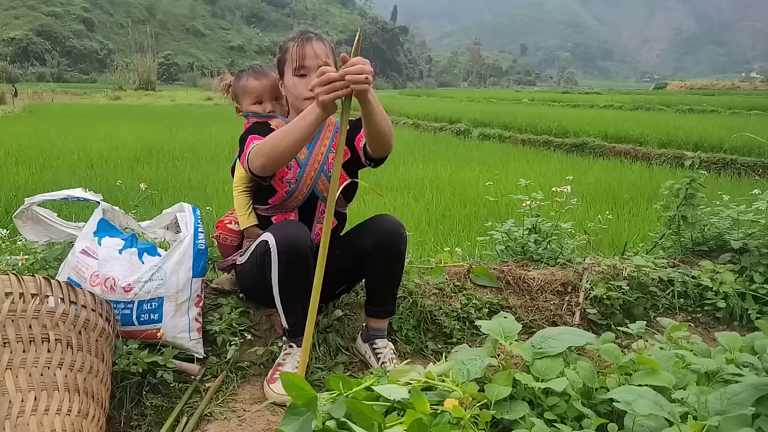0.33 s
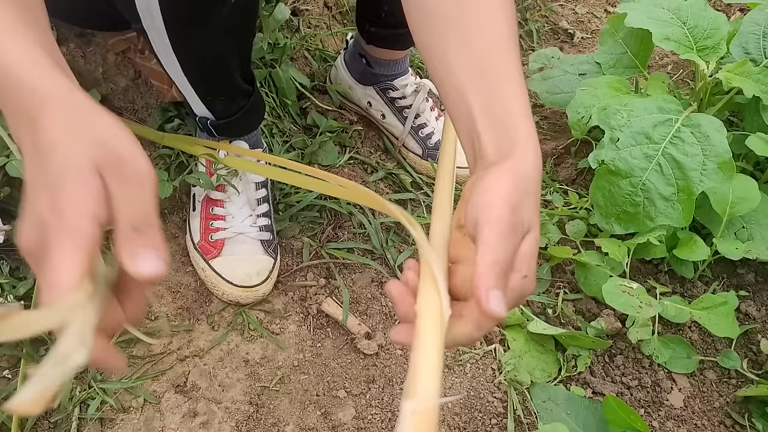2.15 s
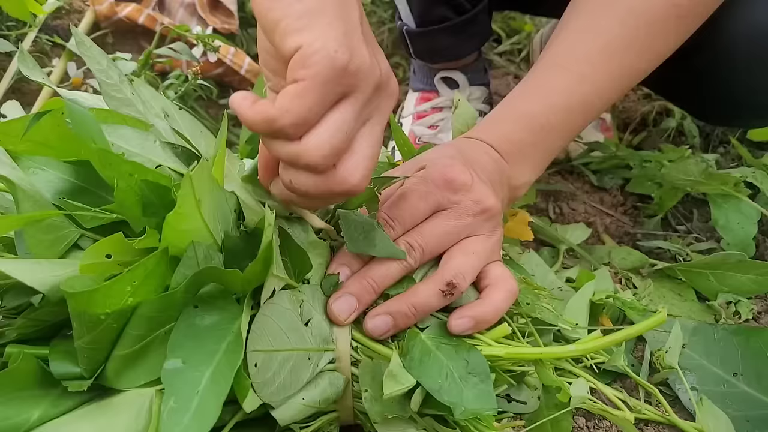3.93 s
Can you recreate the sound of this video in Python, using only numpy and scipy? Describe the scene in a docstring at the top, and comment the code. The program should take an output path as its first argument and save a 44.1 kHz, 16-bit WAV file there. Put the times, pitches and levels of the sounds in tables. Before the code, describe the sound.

Close to the microphone, hands tear the stringy skin off a plant stalk in several short rips with small cracks. They then rummage in a heap of leafy greens and snap stems, hardest around the middle, then more gently to the end. Behind them, in a quiet field, insects hum faintly, with an occasional cricket trill, thin bird chirps and distant calls.

```python
"""Outdoors by a field, insects hum throughout, with now and then a cricket, bird chirps and far calls.
Near the start the sound dips for an instant, then hands tear the stringy skin off a stalk.
From about 1.7 s they rummage in a heap of leafy greens and snap stems, hardest around 3 s, then more
gently to the end. Tearing and rustling are swarms of tiny breaks; thicker fibres and stems give way
with single cracks, close to a left and a right microphone."""
import sys
import numpy as np
from scipy import signal
from scipy.fft import rfft, irfft, next_fast_len
from scipy.io import wavfile
from scipy.ndimage import uniform_filter1d, map_coordinates

SR = 44100
rng = np.random.default_rng(int(sys.argv[2]) if len(sys.argv) > 2 else 0)


def transcribe(signal):
    """Save signal, clipped to [-1, 1], as a 16-bit WAV file at the path in sys.argv[1]."""
    frames = np.atleast_2d(signal).T
    limited = np.clip(frames, -1, 1)
    pcm = np.round(limited * 32767).astype(np.int16)
    wavfile.write(sys.argv[1], SR, pcm)


N = 254016

# pitch ranges of fine fibres (high), crunch (middle) and body (low): lowest f/Hz, highest f/Hz
PITCH_RANGES = [(5000, 20000), (1200, 5000), (200, 1200)]
# tone colour (how strong each frequency is) of stalk skin and of a breaking stem: f/Hz, level/dB
SKIN_COLOUR = [(150, -23), (330, -26.5), (500, -23), (1300, -15), (2700, -4), (4600, -13), (5800, -9.5),
               (7100, 1.5), (8300, -2), (9500, 4), (11500, 0.5), (13200, -7.5), (15000, -10),
               (16500, -29.5)]
STEM_COLOUR = [(150, -8.5), (350, -2), (900, -4), (2000, 4), (4200, 1.5), (6700, 0.5), (9000, -0.5),
               (11500, 4.5), (14500, -6.5), (16000, -19)]
# how the two microphones hear skin, and leaves or stems: f/Hz, left minus right/dB
SKIN_BALANCE = [(700, -1), (1300, -1.5), (2400, 3.5), (4400, 3), (8100, -9.5), (11000, -1), (15000, 12.5)]
GREENS_BALANCE = [(400, -2), (1300, 1.5), (2400, 3), (4400, -8), (8100, -5), (15000, -4)]


def amp(db):
    """Turn decibels into a gain to multiply by."""
    return 10 ** (np.asarray(db) / 20)


def unit(x):
    """Scale a signal to an average power of 1."""
    return x / np.sqrt(np.mean(x ** 2) + 1e-20)


def along(points, hz):
    """Read between (frequency, value) points, giving each octave equal room."""
    freqs, values = np.transpose(points)
    return np.interp(np.log(hz + 1), np.log(freqs + 1), values)


def clock():
    """The time of every sample, in seconds."""
    return np.arange(N) / SR


def wobble(rate):
    """A smooth curve through `rate` random values a second."""
    return map_coordinates(rng.standard_normal(int(N * rate / SR) + 4), [np.arange(N) * rate / SR])


def band(hz, lo, hi, order=6):
    """A gain that lets frequencies from lo to hi through; a higher order has steeper edges."""
    return ((1 + (lo / (hz + 1)) ** (2 * order)) * (1 + (hz / hi) ** (2 * order))) ** -.5


def coloured(x, gain):
    """Turn each frequency of x up or down by gain(hz)."""
    size = next_fast_len(N + SR // 4)
    return irfft(rfft(x, size) * gain(np.fft.rfftfreq(size, 1 / SR)), size)[..., :N]


def filtered(x, lo, hi, order=3):
    """Keep the part of x between lo and hi Hz."""
    return coloured(x, lambda hz: band(hz, lo, hi, order))


def narrow_noise(centre_hz, width_hz):
    """Stereo noise gathered around one pitch."""
    noise = rng.standard_normal((2, N))
    return unit(coloured(noise, lambda hz: np.exp(-.5 * ((hz - centre_hz) / width_hz) ** 2)))


def arch(start, length):
    """A smooth swell from 0 to 1 and back."""
    return np.abs(np.sin(np.pi * np.clip((clock() - start) / length, 0, 1)))


def air():
    """Quiet outdoor air, with a brief opening hush, soft handling bumps and later a faint rumble."""
    # tone colour of open air: f/Hz, level/dB
    air_colour = [(25, -6), (60, -6), (180, -12.5), (350, -12.5), (600, -19), (2200, -23), (3200, -15),
                  (4400, -6), (5200, -14.5), (7300, -10), (8500, -19), (12000, -19.5), (16000, -33.5)]
    # low bumps of handling: t/s, width/s, level/dB
    bumps = [(0.133, 0.026, -67.5), (0.318, 0.016, -78), (1.25, 0.034, -78), (3.488, 0.014, -73)]
    t = clock()
    noise = rng.standard_normal(N) + 1.9 * rng.standard_normal((2, N))  # partly alike on both sides
    steady = amp(-76 + .32 * wobble(3.2)) * unit(coloured(noise, lambda hz: amp(along(air_colour, hz))))
    hush = amp(-77.5) * (t < .37) * unit(filtered(rng.standard_normal((2, N)), 500, 4900))
    bump_gain = sum(amp(db) * np.exp(-.5 * ((t - at) / width) ** 2) for at, width, db in bumps)
    thuds = bump_gain * unit(filtered(noise, 20, 105, order=2)) * amp([[3], [-5]])  # louder on the left
    rumble_gain = amp(-91 + 3.3 * wobble(2.82)) * np.clip(t - 1.5, 0, 1)
    rumble = rumble_gain * unit(filtered(rng.standard_normal(N), 100, 165))
    return steady + hush + thuds + rumble


def insects(pulse_hz=22, echo_share=.16):
    """Many far insects merge into one high hum; a nearer cricket trills in short bouts."""
    # cricket trills: start/s, end/s, f/Hz, relative level/dB
    trills = [(0.379, 0.5, 4000, -66), (1.544, 1.964, 4090, -71), (4.309, 4.52, 4200, -69.5),
              (5.182, 5.353, 4120, -70)]
    t = clock()
    out = amp(-71 + 1.6 * wobble(21)) * narrow_noise(4280, 300)
    for start, end, hz, db in trills:
        pulses = np.sin(np.pi * pulse_hz * (t - start)) ** 2
        pulses = echo_share + (1 - echo_share) * pulses  # echoes fill the pauses
        tone = np.sin(2 * np.pi * np.cumsum(hz + 70 * wobble(400)) / SR)
        out += amp(db + 8) * arch(start, end - start) ** .5 * pulses * tone
    return out


def birds():
    """Thin upward chirps, and faint held calls blurred by distance."""
    # chirps of a small bird: start/s, length/s, first f/Hz, last f/Hz, relative level/dB
    chirps = [(0.624, 0.049, 5300, 6530, -58), (1.456, 0.057, 5240, 6350, -66.5),
              (1.861, 0.053, 5500, 7170, -62), (2.135, 0.033, 5200, 6750, -61)]
    # far-off calls, perhaps roosters: start/s, length/s, f/Hz, level/dB
    far_calls = [(0.165, 0.14, 1263, -75.5), (.21, 0.056, 2280, -74), (.38, 0.72, 1566, -76),
                 (2.353, .22, 1305, -73)]
    t, out = clock(), np.zeros((2, N))
    for start, length, low, high, db in chirps:
        hz = low + (high - low) * np.clip((t - start) / length, 0, 1) + 380 * wobble(1100)
        out += amp(db + 1.5) * arch(start, length) * np.sin(2 * np.pi * np.cumsum(hz) / SR)
    for start, length, hz, db in far_calls:
        tone = np.sin(2 * np.pi * np.cumsum(hz + 30 * wobble(220)) / SR)
        out += amp(db) * arch(start, length) ** .5 * unit(tone + 2.2 * narrow_noise(hz, 45))
    return out


def ground_echo(x, fade_s=.043):
    """Soil and plants scatter the sound back as a very short, thin echo."""
    t = np.arange(SR // 6) / SR
    tail = rng.standard_normal((2, len(t))) * amp(-60 * t / fade_s) * (t > .002)
    scattered = signal.oaconvolve(x, tail / np.linalg.norm(tail[0]), axes=1)[:, :N]
    return filtered(scattered, 1200, 14000)


def ring(colour, balance, shape, size=8192):
    """How a material answers one tiny tap, left and right; shape(hz) picks the frequencies."""
    hz = np.fft.rfftfreq(size, 1 / SR)
    gain = amp(along(colour, hz) + np.outer([.5, -.5], along(balance, hz))) * shape(hz)
    # these steps (minimum phase) put all the ringing after the tap
    cepstrum = irfft(np.log(gain + 1e-6))
    cepstrum[:, 1:size // 2] *= 2
    cepstrum[:, size // 2 + 1:] = 0
    return irfft(np.exp(rfft(cepstrum)))


def cracks(breaks, colour, balance, crack_s=.00013, splinter_s=.0027, lag_s=.00004, size=2048):
    """Each break is one sharp crack that rings briefly while the last fibres splinter."""
    out, t = np.zeros((2, N + 2 * size)), np.arange(size) / SR
    grit, ring_sharpness = .3, 2.13
    spread = np.sqrt(SR / 200 / size)  # levels count as if each hit lasted 5 ms
    for at, crack_db, ring_db, knock_db, splinter_db, ring_hz in breaks:
        crack = unit((t == 0) + grit * rng.standard_normal(size) * np.exp(-t / crack_s))
        crack = np.array([crack, np.roll(crack, round(lag_s * SR))])  # reaches the right side later
        splinter_gain = np.exp(-t / splinter_s) * (1 - np.exp(-t / crack_s))
        force = crack + amp(splinter_db) * unit(rng.standard_normal((2, size)) * splinter_gain)
        bright = lambda hz: band(hz, *PITCH_RANGES[0])
        off_pitch = lambda hz: (hz + 1) / ring_hz - ring_hz / (hz + 1)
        hollow = lambda hz: 1 / (1 + (ring_sharpness * off_pitch(hz)) ** 2 / 2)
        dull = lambda hz: band(hz, 280, 1100, order=2)
        for shape, db in (bright, crack_db), (hollow, ring_db), (dull, knock_db):
            hit = signal.fftconvolve(force, ring(colour, balance, shape), axes=1)[:, :size]
            out[:, round(at * SR):][:, :size] += amp(db) * unit(hit) * spread
    return amp(-1.63) * out[:, :N]


def tiny_breaks(per_s, size_db, clump_db, rubbing_db, lag_samples=2.5):
    """A swarm of clicks over smooth rubbing; each click reaches the two sides with its own delay."""
    count = int(per_s * N / SR)
    polarity, size, lag, lean = rng.standard_normal((count, 4)).T
    at = rng.integers(0, N, count)
    clicks = np.sign(polarity) * amp(size_db * np.minimum(size, 2))
    sides = []
    for side in (1, -1):
        arrival = (at + np.round(side * lag_samples * lag).astype(int)) % N
        sides.append(np.bincount(arrival, clicks * amp(side * lean), N))
    swarm = unit(np.array(sides)) + amp(rubbing_db) * rng.standard_normal((2, N))
    return swarm * amp(clump_db * wobble(260))  # fibres let go in bundles


def flex(swarm, depth_db, size=256):
    """Bending leaves and fibres ring at pitches that come and go as the grip shifts."""
    spectra = signal.stft(swarm, nperseg=size)[2]
    drift = uniform_filter1d(rng.standard_normal(spectra.shape[1:]), size=3, axis=0)  # smooth in pitch
    drift = uniform_filter1d(drift, size=30, axis=1)  # and in time
    return signal.istft(spectra * amp(depth_db * unit(drift)), nperseg=size)[1][:, :N]


def stroke(start, rise, fall, depth_db=25):
    """The gain of one hand movement: force builds to a rounded peak, then lets go."""
    since_peak = clock() - start - rise
    rising, falling = np.maximum(-since_peak / rise, 0), np.maximum(since_peak / fall, 0)
    return amp(-depth_db * np.minimum(rising ** 2.17 + falling ** 1.12, 10))


def rustle(movements, swarm, colour, balance):
    """The swarm sounds in each pitch range as strongly as the hands work the material."""
    power, out = np.zeros((3, N)), np.zeros((2, N))
    for gain, db, crunch_db, body_db in movements:
        power += np.outer(amp(db + np.array([0, crunch_db, body_db])) ** 2, gain ** 2)
    for (lo, hi), effort in zip(PITCH_RANGES, np.sqrt(power)):
        response = ring(colour, balance, lambda hz: band(hz, lo, hi))
        out += effort * unit(signal.oaconvolve(swarm, response, axes=1)[:, :N])
    return out


def knocks(crack_db=-9.5, ring_db=-12.5, splinter_db=-13):
    """A knocked stalk gives mostly a dull thud, with hardly any splintering."""
    # dry knocks: t/s, relative level/dB, ring f/Hz
    blows = [(1.074, -43.5, 1460), (2.413, -46.5, 597)]
    hits = [(at, db + crack_db, db + ring_db, db, splinter_db, hz) for at, db, hz in blows]
    return cracks(hits, STEM_COLOUR, GREENS_BALANCE)


def fibres(ring_hz=3200, ring_db=-16.5, knock_db=-38, splinter_db=-3):
    """Thick fibres of the skin part one by one, alike in tone but not in strength."""
    # fibres parting: t/s, relative level/dB
    partings = [(0.399, -45.5), (0.418, -35), (.5284, -44.5), (.546, -41), (.688, -43.5), (.696, -45.5),
                (0.8102, -39), (.8943, -20), (0.921, -32), (0.9458, -37.5), (0.9575, -30.5), (1.189, -41.5),
                (1.2068, -30.5)]
    breaks = [(at, db, db + ring_db, db + knock_db, splinter_db, ring_hz) for at, db in partings]
    return cracks(breaks, SKIN_COLOUR, SKIN_BALANCE)


def peeling(body_under_crunch_db=17.5):
    """Skin rips along the hollow stalk in a very dense run of tiny breaks."""
    # pulls on the skin: start/s, rise/s, fall/s, relative level/dB, crunch over that level/dB
    pulls = [(0.389, 0.028, 0.031, -37.5, -16.5), (.41, 0.059, 0.024, -52.5, -16),
             (0.527, 0.085, 0.055, -33, -14), (.675, 0.024, 0.047, -56, -11),
             (.70, 0.031, 0.11, -45.5, -15.5), (.79, .09, 0.11, -34.5, -14),
             (.895, 0.023, 0.021, -33.5, -8.5), (0.941, 0.018, .052, -31.5, -13.5),
             (1.183, 0.034, 0.055, -33, -12.5), (1.2, 0.048, 0.033, -37, 5.5),
             (1.26, 0.083, 0.24, -70, -3.5)]
    swarm = tiny_breaks(per_s=5600, size_db=3.5, clump_db=1.5, rubbing_db=-1.5, lag_samples=2.8)
    movements = [(stroke(start, rise, fall), db, crunch_db, crunch_db - body_under_crunch_db)
                 for start, rise, fall, db, crunch_db in pulls]
    return amp(-1.1) * rustle(movements, flex(swarm, depth_db=3.5), SKIN_COLOUR, SKIN_BALANCE)


def leaves(stir_start_s=1.8, stir_fade_s=.5):
    """Leaves slide over each other, single veins crinkle, and stray leaves tick as they spring back."""
    # tone colour of leaves: f/Hz, level/dB
    leaf_colour = [(150, -21), (550, -19), (1000, -18.5), (1600, -15), (2100, -9.5), (3300, -6), (4400, -6),
                   (6000, -5.5), (7500, 0), (8700, -7.5), (11700, 7.5), (13800, -2.5), (16000, -10.5)]
    # handfuls pushed or crushed: start/s, rise/s, fall/s, relative level/dB, crunch/dB, body/dB
    # (here and below, crunch and body are added to the level)
    handfuls = [(1.716, 0.023, .1, -69.5, -15, -23.5), (1.961, 0.1, 0.05, -79, 7.5, 7),
                (2.152, 0.042, 0.095, -62.5, -8, -22.5), (2.305, 0.049, 0.038, -53.5, 4, -11.5),
                (2.37, 0.045, 0.096, -56, -3.5, -7.5), (2.408, 0.015, 0.015, -54, 0, -1),
                (2.545, .027, .04, -49.5, -7.5, -20), (2.612, .02, 0.038, -48.5, 0, -22),
                (2.646, 0.023, 0.079, -41, -8.5, -32.5), (2.833, 0.041, 0.076, -36, -10, -39),
                (2.895, .03, 0.041, -35.5, -6, -27.5), (2.958, 0.021, 0.07, -38, -6.5, -24.5),
                (2.98, 0.077, 0.16, -45.5, -9.5, -31.5), (3.089, 0.038, 0.048, -40.5, -10.5, -32.5),
                (3.151, 0.03, 0.017, -38, -13.5, -34), (3.21, 0.018, 0.018, -40, -12.5, -18.5),
                (3.232, 0.025, 0.049, -45.5, -9.5, -25), (3.439, 0.034, 0.02, -38.5, -12.5, -26.5),
                (3.465, .033, .028, -42, -4.5, -19), (3.519, 0.022, 0.046, -47.5, -8.5, -15.5),
                (3.569, 0.059, 0.14, -54, -2.5, -20), (3.705, 0.032, 0.11, -50.5, -11.5, -19.5),
                (3.83, .038, 0.024, -45, 1.5, -18.5), (3.875, 0.024, 0.042, -51.5, -2.5, -18.5),
                (4.146, .022, 0.082, -64, 3.5, -8.5), (4.411, 0.029, 0.025, -65.5, -6, -16),
                (4.49, 0.067, 0.044, -65.5, 0.5, -21.5), (4.639, 0.016, 0.058, -61, 0.5, -20.5),
                (4.708, 0.058, .07, -51.5, -2.5, -25), (4.757, 0.04, 0.084, -62, 6.5, -6.5),
                (4.861, 0.029, 0.75, -62.5, -2, -17), (5.053, 0.049, 0.13, -48.5, -8, -37),
                (5.302, 0.04, 0.046, -62, -2, -18.5), (5.502, 0.03, 0.23, -60.5, 1.5, -15.5),
                (5.618, 0.12, 0.067, -61.5, -4.5, -28)]
    # the heap stirring between handfuls: relative level/dB, crunch/dB, body/dB
    stir_levels = (-72.5, -7, -23)
    # stray leaves: rate/Hz, relative level/dB, crunch/dB, body/dB
    strays = (25, -77, -6.5, -24.5)
    sliding = tiny_breaks(per_s=2500, size_db=5, clump_db=1.4, rubbing_db=-2)
    crinkles = amp(-5) * tiny_breaks(per_s=170, size_db=3, clump_db=1, rubbing_db=-40)
    stirring = np.clip((clock() - stir_start_s) / stir_fade_s, 0, 1) * amp(2 * wobble(15))
    movements = [(stroke(start, rise, fall), *levels) for start, rise, fall, *levels in handfuls]
    movements.append((stirring, *stir_levels))
    rubbing = rustle(movements, flex(sliding + crinkles, depth_db=2.5), leaf_colour, GREENS_BALANCE)
    tick_rate, *tick_levels = strays
    ticks = tiny_breaks(per_s=tick_rate, size_db=2.5, clump_db=1, rubbing_db=-40)
    ticking = rustle([(stirring, *tick_levels)], ticks, leaf_colour, GREENS_BALANCE)
    return amp(-1) * (rubbing + ticking)


def snaps(ring_hz=4210, splinter_db=1, cleanness=.3):
    """Stems snap; the harder the snap, the cleaner the break and the smaller the share of splinters."""
    # stems breaking, with relative levels: t/s, crack/dB, ring/dB, knock/dB
    stems = [(.0534, -61.5, -56.5, -88), (0.133, -62, -59, -80), (1.398, -65, -80, -82),
             (1.9498, -52, -66, -74), (2.001, -52.5, -84, -72), (2.0507, -56, -81, -72),
             (2.2926, -44, -54, -69), (2.586, -38, -38, -92), (2.6227, -45.5, -43.5, -76),
             (2.664, -33.5, -38.5, -82), (2.6659, -31, -49, -73), (2.9066, -32, -43, -72),
             (2.9206, -41.5, -48, -65), (2.9742, -34.5, -40.5, -81), (2.9956, -44, -58, -61),
             (3.175, -32.5, -46.5, -79), (3.1931, -47, -47.5, -83), (3.2311, -33, -45, -57),
             (3.2776, -42, -55, -77), (3.3798, -20.5, -39.5, -68.5), (3.463, -37.5, -48.5, -85),
             (3.6238, -36.5, -51.5, -88), (3.68, -46.5, -68, -66), (3.7258, -47.5, -72, -82),
             (3.7516, -47, -60, -80), (3.8369, -46.5, -53, -72), (3.8628, -36.5, -40, -60.5),
             (3.8975, -47.5, -50, -80), (4.0381, -51, -58, -74.5), (4.16, -50, -59.5, -70.5),
             (4.9277, -60.5, -53.5, -66), (5.125, -45, -46.5, -60.5), (5.5319, -45, -57, -80),
             (5.5771, -49.5, -55.5, -57.5), (5.7237, -48, -52, -68)]
    average_db = np.mean([row[1] for row in stems])
    breaks = [(at, db, ring_db, knock_db, splinter_db - cleanness * (db - average_db), ring_hz)
              for at, db, ring_db, knock_db in stems]
    return cracks(breaks, STEM_COLOUR, GREENS_BALANCE)


def scene():
    """The hands work close by, with the field behind them."""
    hands = peeling() + fibres() + leaves() + snaps() + knocks()
    return hands + amp(-9.5) * ground_echo(hands) + insects() + birds() + air()


def record(dry, top_hz=16400):
    """The level dips for an instant, and the very highest treble is cut off."""
    dip = (clock() > .358) & (clock() < .384)
    return coloured(dry * np.where(dip, amp(-31), 1), lambda hz: hz < top_hz)


dry = scene()
out = record(dry)
transcribe(out)
```